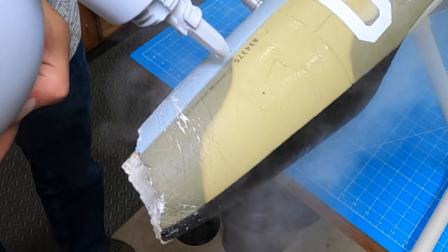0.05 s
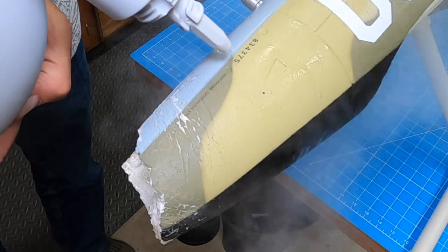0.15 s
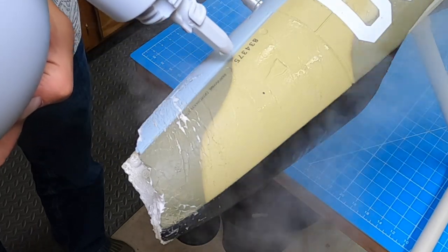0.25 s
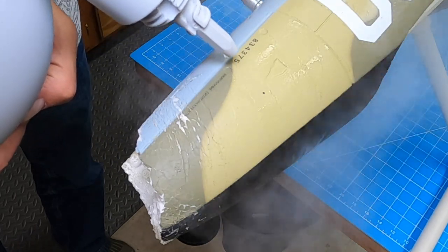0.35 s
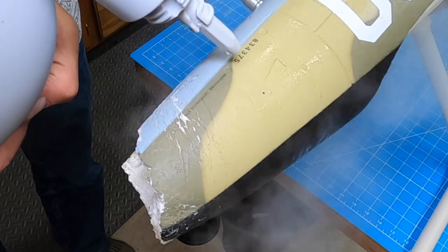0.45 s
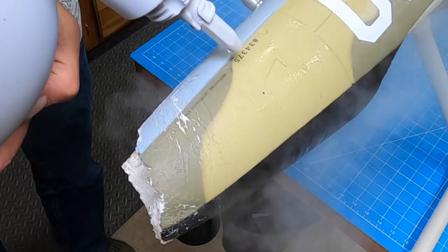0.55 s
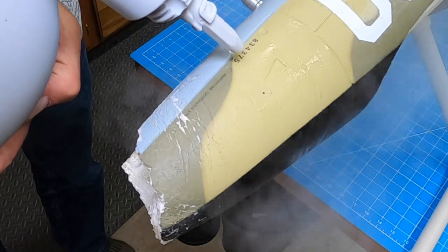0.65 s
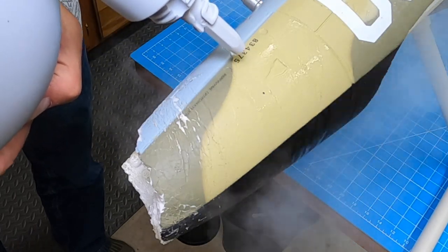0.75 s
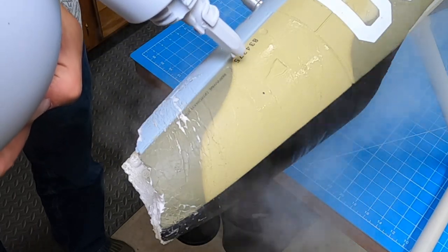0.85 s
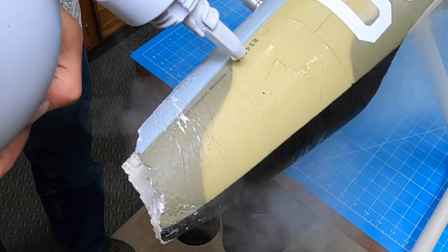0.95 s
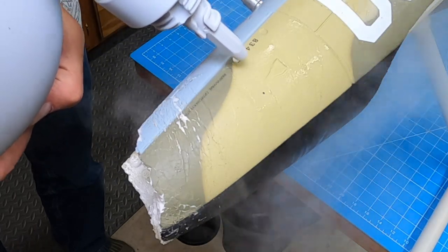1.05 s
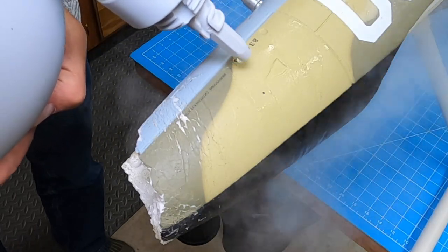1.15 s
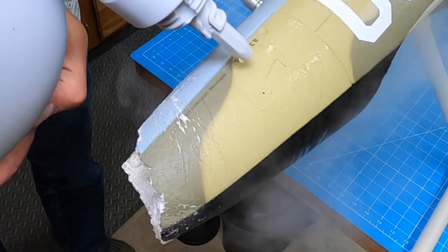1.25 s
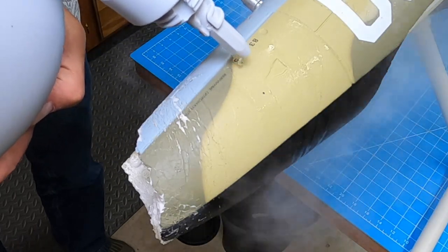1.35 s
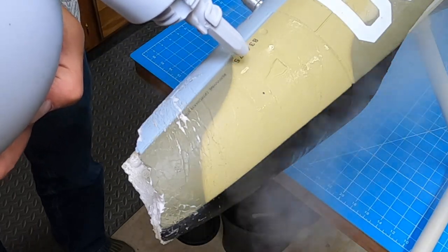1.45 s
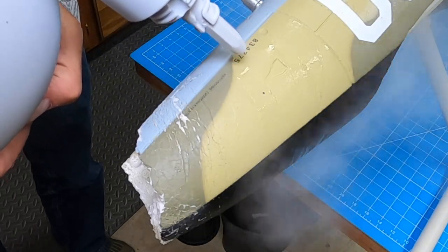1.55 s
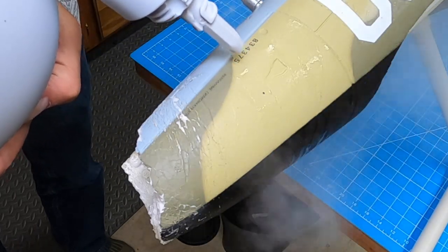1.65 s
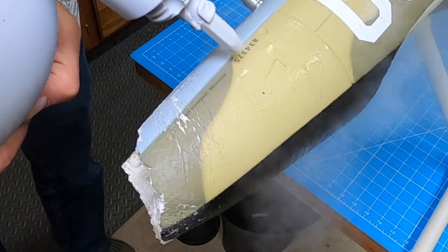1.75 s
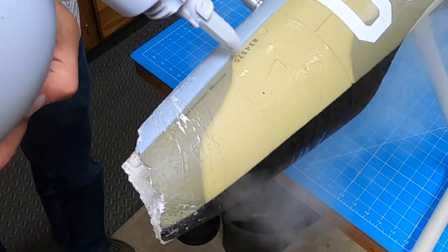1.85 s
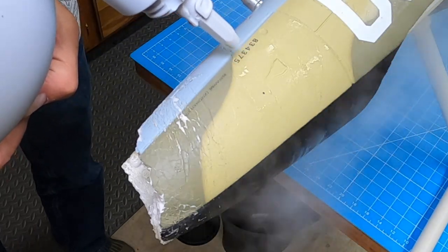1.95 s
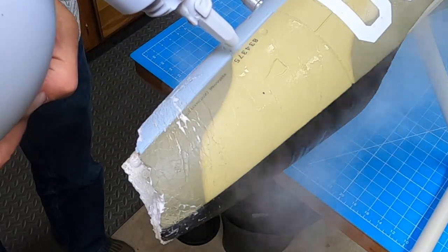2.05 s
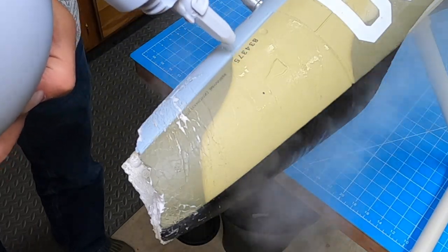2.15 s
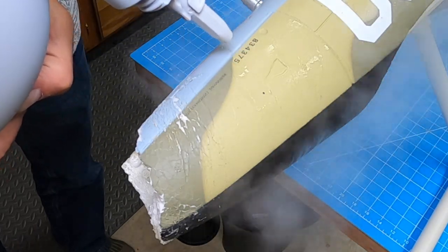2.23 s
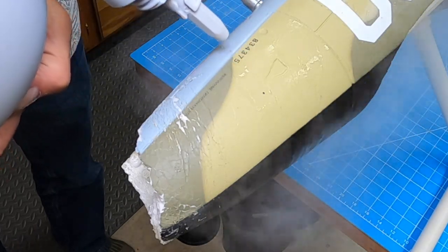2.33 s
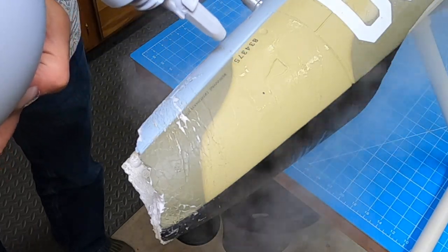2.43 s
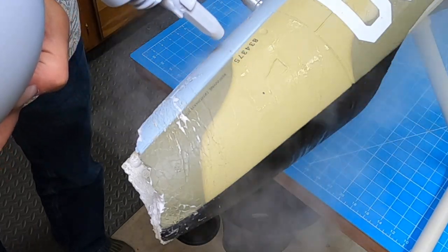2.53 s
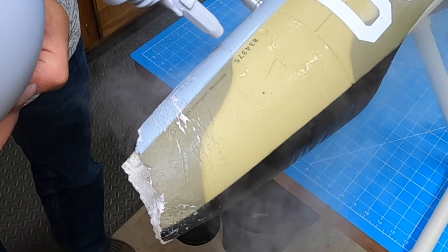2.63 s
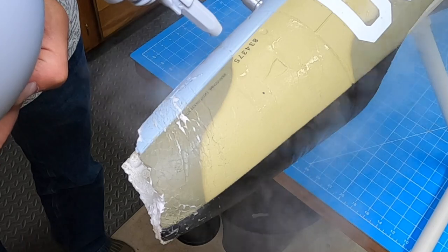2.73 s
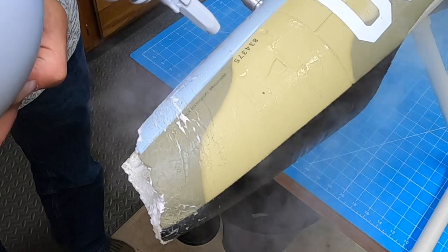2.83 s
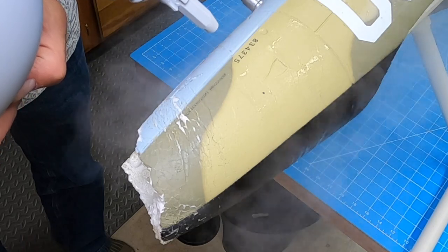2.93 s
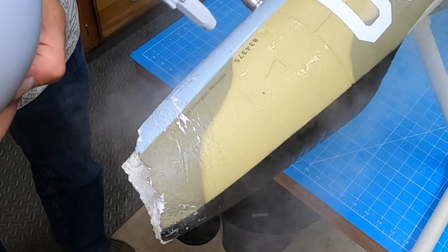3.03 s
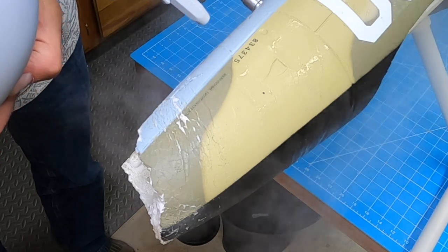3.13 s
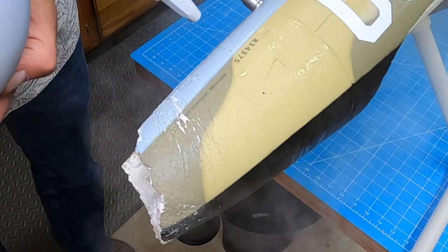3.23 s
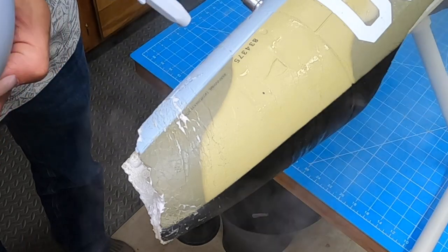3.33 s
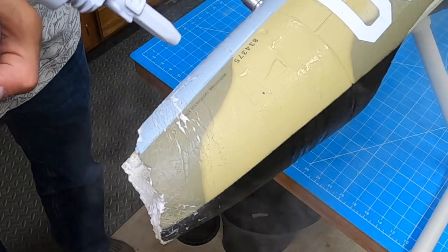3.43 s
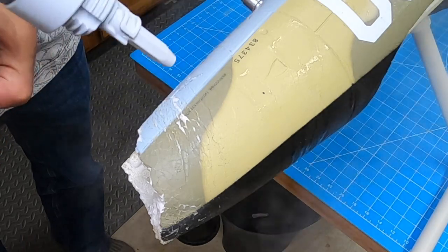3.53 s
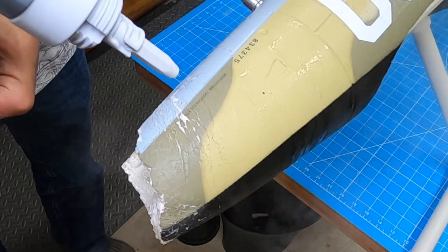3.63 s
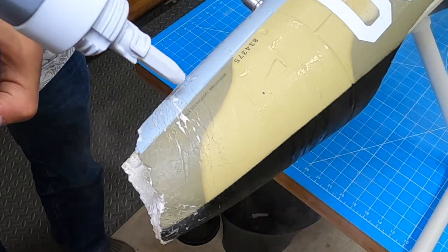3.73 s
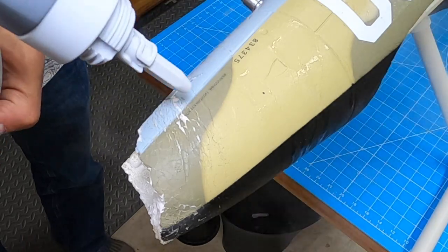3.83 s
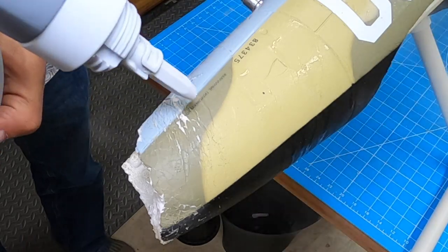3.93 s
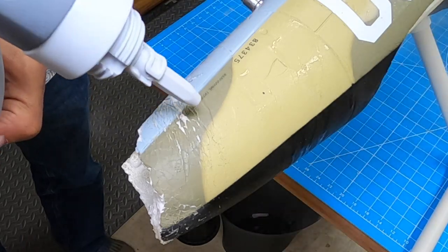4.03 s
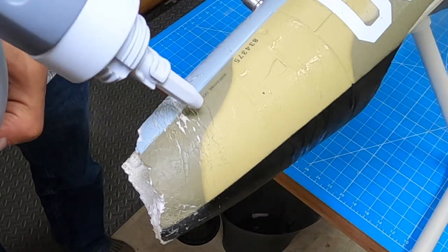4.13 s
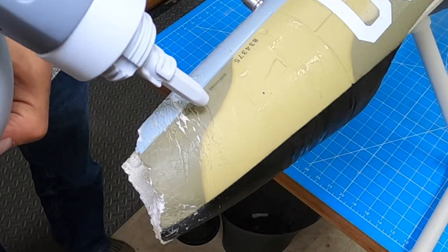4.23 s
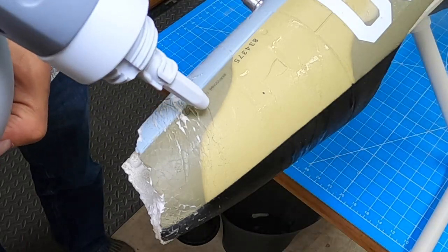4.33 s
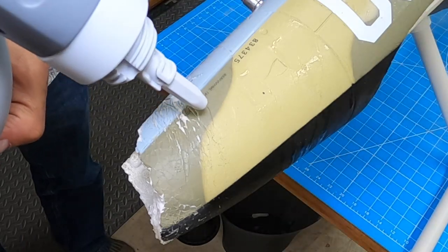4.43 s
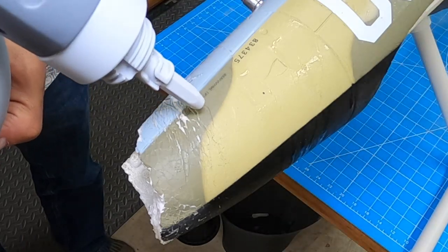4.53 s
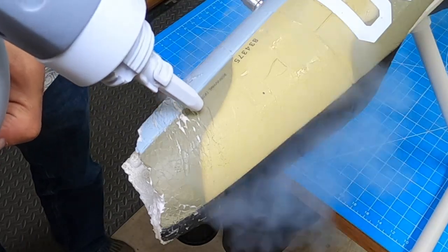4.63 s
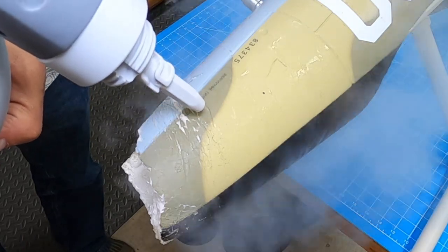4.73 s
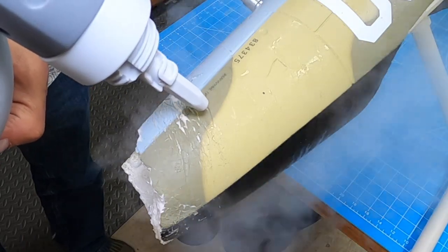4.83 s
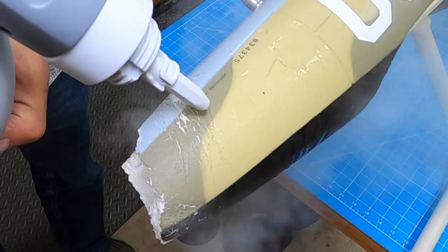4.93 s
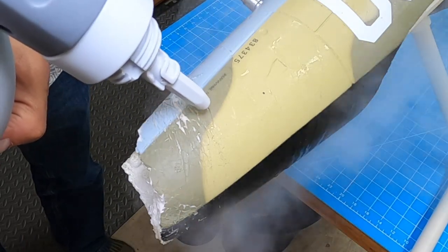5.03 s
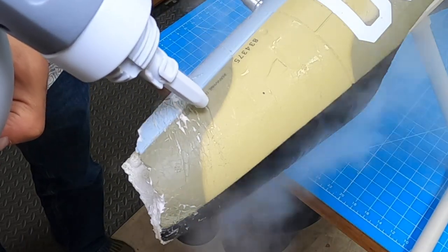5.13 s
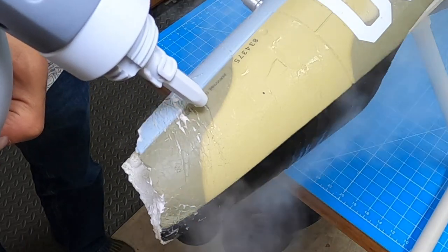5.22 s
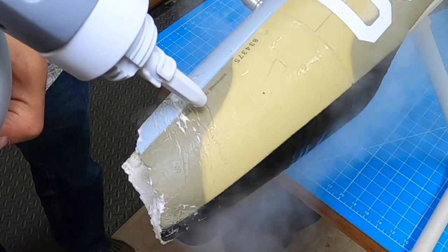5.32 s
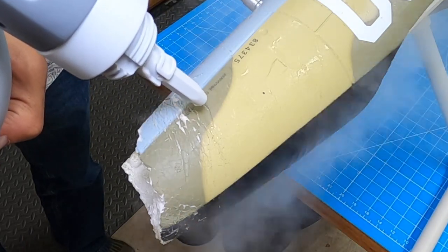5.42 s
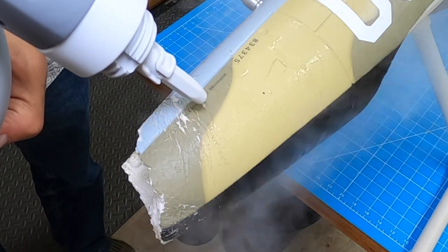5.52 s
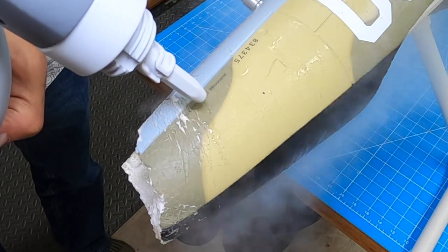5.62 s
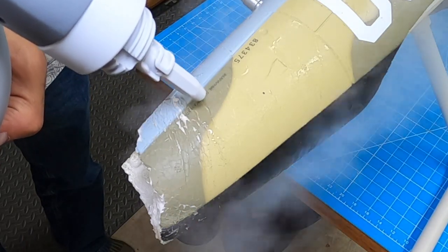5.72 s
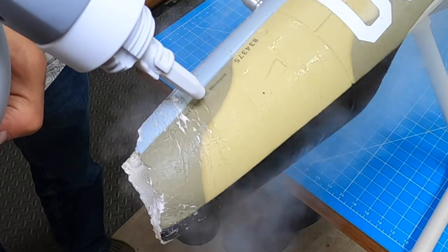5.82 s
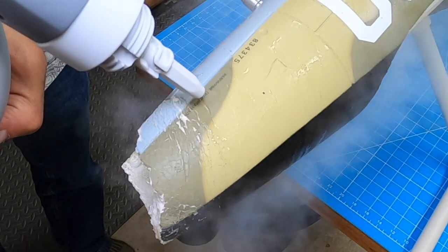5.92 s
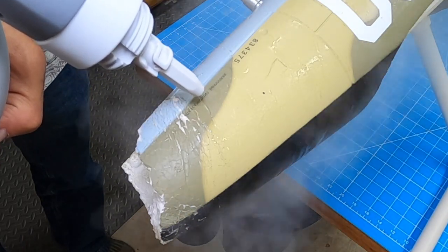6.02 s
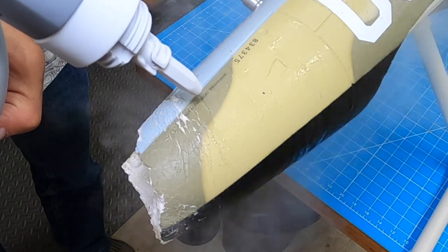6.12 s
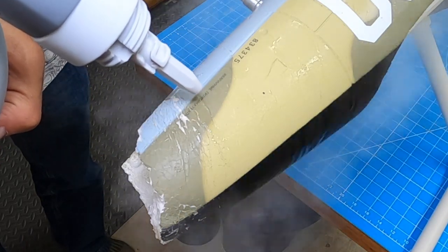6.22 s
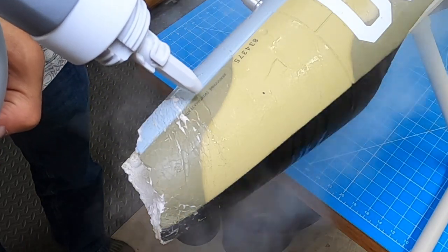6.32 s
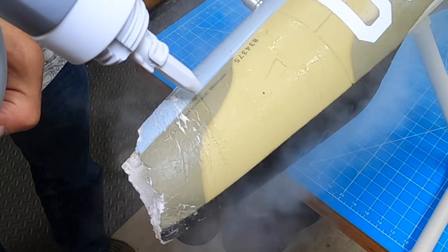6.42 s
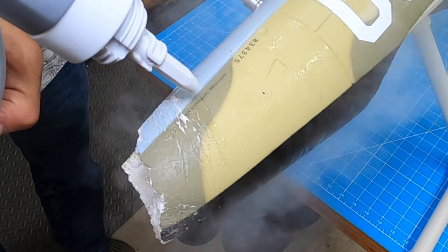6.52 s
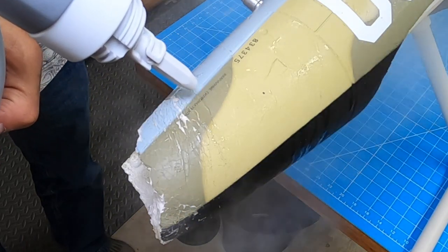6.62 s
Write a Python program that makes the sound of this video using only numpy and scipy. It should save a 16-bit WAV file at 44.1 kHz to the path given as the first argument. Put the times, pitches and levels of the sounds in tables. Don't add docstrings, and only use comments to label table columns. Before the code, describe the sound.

From 0 s a handheld steamer is already blowing, close to a small stereo microphone in a dry workshop: a loud, dense hiss strongest in the upper mids, grainy with bursting droplets, with irregular low puffs several times a second where steam breaks on foam. From about 2.3 s the puffs weaken as the nozzle lifts, and a thin, wavering whistle near 4 kHz climbs and swells, slightly left, peaking around 2.9 s. At about 3.15 s the valve snaps shut and the hiss drains away quickly. Until 4.6 s there is quiet boiler simmer, a thin leak and barely audible mains hum; a dull touch at 3.9 s and three plastic trigger clicks from 4.0 to 4.1 s, followed by stronger seething. At 4.6 s a bright spit cracks open, surging by 4.7 s into a second, slightly stronger blast that hisses and sputters steadily until the end, about 6.7 s.

```python
import sys
import numpy as np
from scipy import signal
from scipy.fft import rfft, irfft, next_fast_len
from scipy.io import wavfile
from scipy.ndimage import uniform_filter1d

SR = 44100
rng = np.random.default_rng(int(sys.argv[2]) if len(sys.argv) > 2 else 0)


def int16_out(signal):
    q = np.round(np.clip(np.atleast_2d(signal).T, -1, 1) * 32767)
    wavfile.write(sys.argv[1], SR, q.astype(np.int16))


def makeup_ratio(level_db):
    decades = np.asarray(level_db, float) / 20
    return 10 ** decades


N = 294147
T = np.arange(N) / SR
SIZE = next_fast_len(N)
HZ = np.fft.rfftfreq(SIZE, 1 / SR) + 1
PAUSE_S, RESUME_S = 3.28, 4.595
LIFT_S = 2.92


def shape(table):
    hz, value = np.transpose(table)
    return np.interp(np.log(HZ), np.log(hz), value)


def resonances(modes):
    return makeup_ratio(sum(db / (1 + (2 * (HZ - hz) / width) ** 2) for hz, width, db in modes))


def band_rms(spectrum, lo_hz, hi_hz):
    inside = (HZ > lo_hz) & (HZ < hi_hz)
    return np.sqrt(2 * np.sum(np.abs(spectrum[inside]) ** 2)) / SIZE


def walk(rate):
    hold = int(SR / rate)
    steps = np.repeat(rng.standard_normal(N // hold + 1), hold)
    return 1.3 * uniform_filter1d(uniform_filter1d(steps, hold), hold)[:N]


def peak(at_s, db, rise_db_per_s, fall_db_per_s):
    return db - np.maximum(rise_db_per_s * (at_s - T), fall_db_per_s * (T - at_s))


def opening():
    since_shut, since_open = T - 3.153, T - 4.655
    closing = -620 * since_shut
    draining = -12 - 290 * since_shut
    lingering = -47 - 32 * since_shut
    shut = np.max([closing, draining, lingering], axis=0)
    seeping = -23.5 + 120 * since_open
    start = np.maximum(1050 * since_open, seeping)
    return np.minimum(np.where(T < RESUME_S, shut, start), 0)


def bands(spectra, layer_hz, layer_db, flicker_db, rate):
    out = 0
    for octave in np.arange(5, 14.6, .5):
        window = np.clip(1 - np.abs(np.log2(HZ) - octave) * 2, 0, 1)
        share = [np.interp(octave, np.log2(layer_hz), row) for row in np.eye(len(layer_hz))]
        band_flicker_db = flicker_db * (4 if octave > 13.4 else 1)
        level_db = share @ layer_db + band_flicker_db * walk(rate)
        out = out + makeup_ratio(level_db) * irfft(spectra * window, SIZE)[:, :N]
    return out


# f/Hz, level/dB per Hz
ROOM_COLOUR = [(30, -44), (60, -24), (90, -30.5), (150, -10.5), (300, -4), (450, -3.5), (830, -18),
               (1250, -9.5), (2300, -15.5), (3200, -25), (4500, -19.5), (5600, -23), (8000, -35),
               (13000, -46.5), (15000, -56.5)]
# f/Hz, share/0-1
ROOM_ALIKE = [(60, .9), (300, 0.88), (700, 0.98), (2000, 0.5), (4500, .6), (6000, .2), (12000, .05)]
# f/Hz, width/Hz, level/dB
BOILER_RINGS = [(288, 50, 4.5), (437, 44, 5.5), (2295, 370, 4.5), (4500, 500, 4)]
# f/Hz, level/dB rms
MAINS_HUM = [
    (60, -80),
    (120, -80),
]


def workshop():
    after = 4.5 * np.exp(-np.maximum(T - PAUSE_S, 0) / 0.18)
    touch_s = 4.15
    touch = 10 * np.exp(-np.maximum(T - touch_s, 0) / 0.54) * np.clip(1 + (T - touch_s) / 0.24, 0, 1)
    simmer = 1 - 0.47 * after + 0.18 * touch
    seethe = -2.5 + .5 * after + touch
    leak = -2.5 + after + 0.89 * touch
    layers = np.array([simmer, seethe, leak, 0 * T])

    alike = np.clip(shape(ROOM_ALIKE), 0, 1)
    shared, left, right = (rfft(rng.standard_normal(N) * makeup_ratio(1.7 * walk(68)), SIZE) for _ in range(3))
    lag = np.exp(.8j * np.clip(HZ / 1000, 0, 1) * (HZ < 3800))
    common = np.sqrt(alike) * np.array([shared, shared * lag])
    pair = common + np.sqrt(1 - alike) * np.array([left, right])
    pair = pair * makeup_ratio(shape(ROOM_COLOUR)) * resonances(BOILER_RINGS) * makeup_ratio([[.6], [-.6]])
    pair = pair / band_rms(pair.mean(axis=0), 200., 600.)
    hum = sum(makeup_ratio(db + 3) * np.sin(2 * np.pi * hz * T) for hz, db in MAINS_HUM)
    return makeup_ratio(-60) * bands(pair, (350, 1600, 4500, 8000), layers, flicker_db=1.3, rate=15) + hum


# t/s, peak level/dB, brightness/dB, ring/s
TRIGGER_TICKS = [
    (3.907, -46, -20, .02),
    (4.0045, -37.5, -8, .07),
    (4.0685, -37, -4, .07),
    (4.0895, -33.5, -4, 0.088),
]
# f/Hz, width/Hz, level/dB
TRIGGER_MODES = [(900, 540, 3.5), (1470, 910, 7.5), (2900, 1500, 2.5), (4670, 1600, -3), (6400, 1600, -10)]


def trigger():
    out = np.zeros((2, N))
    t = T[:SR // 8]
    for start_s, db, bright_db, ring_s in TRIGGER_TICKS:
        decay = np.exp(-np.log(1000) * t / max(ring_s, .005))
        push = rng.standard_normal((2, len(t))) * .09 * decay
        push[:, 0] += 1
        knock = 0
        for hz, width, mode_db in TRIGGER_MODES:
            sos = signal.butter(2, [hz - width / 2, hz + width / 2], "band", fs=SR, output="sos")
            mode = signal.sosfilt(sos, signal.sosfilt(sos, push))
            knock = knock + makeup_ratio(mode_db + bright_db * (hz > 2500)) * mode
        start = int(start_s * SR)
        out[:, start:start + len(t)] += makeup_ratio(db) * knock / np.abs(knock).max()
    return out


def whistle():
    hz = 4097 + 90 * np.minimum(T - LIFT_S, 0)
    db = peak(LIFT_S, -29, rise_db_per_s=10.5, fall_db_per_s=19.5) + 2 * opening()
    phase = 2 * np.pi * np.cumsum(hz * (1 + .01 * walk(50))) / SR
    tone = np.sin(phase) * makeup_ratio(db + 2.5 + 4.0 * walk(40)) * (T < PAUSE_S)
    return tone * makeup_ratio([[1.2], [-1.2]])


def valve():
    swell = peak(4.645, -24.5, rise_db_per_s=400, fall_db_per_s=2198)
    spit = peak(4.615, -31, rise_db_per_s=1100, fall_db_per_s=1100)
    thin = np.maximum(swell, spit) + 1600 * np.minimum(T - 4.592, 0)
    burst = peak(4.715, -20, rise_db_per_s=110, fall_db_per_s=109.5) + 2 * opening()
    out = 0
    for db, edges_hz in ((thin, (3800, 6220)), (burst, (3020, 4500))):
        sos = signal.butter(3, edges_hz, "band", fs=SR, output="sos")
        hiss = signal.sosfilt(sos, rng.standard_normal(N))
        out = out + hiss / hiss.std() * makeup_ratio(db)
    return out * makeup_ratio([[1.2], [-1.2]])


def bench():
    t60_s, echo_db = .12, -14
    t = T[:SR // 4]
    echoes = rng.standard_normal(len(t)) * np.exp(-np.log(1000) * t / t60_s) * (t > .002)
    return 1 + makeup_ratio(echo_db) * rfft(echoes / np.sqrt(np.sum(echoes ** 2)), SIZE)


def turbulence():
    eddies = rng.standard_normal(N) * makeup_ratio(0.57 * walk(400))
    size_db = np.minimum(9 + 2.5 * rng.exponential(size=N), 15)
    drops = (rng.random(N) < 150 / SR) * rng.choice([-1, 1], N) * makeup_ratio(size_db)
    return rfft(eddies + drops, SIZE)


JET_LAYERS = (300, 1100, 3000, 5600, 10000)
# f/Hz, level/dB per Hz
BLAST_COLOURS = [
    [(24, -69.5), (40, -37.5), (304, -14), (327, -16.5), (389, -18.5), (510, -17), (653, -11), (995, -13),
     (2360, -3), (3100, -3), (4070, -1), (7370, -13.5), (8550, -25), (12100, -31), (14700, -48.5)],
    [(24, -70), (40, -41), (102, -20.5), (327, -14), (379, -17), (429, -11.5), (837, -11), (1410, -8),
     (2250, -0.5), (3970, -1), (5210, -3.5), (7370, -11.5), (8550, -21.5), (12100, -29.5), (14700, -51)],
]
# f/Hz, level/dB per Hz
SIDE_COLOUR = [(24, -71), (40, -40.5), (160, -18), (523, -11.5), (900, -10), (1370, -13), (2360, -2),
               (3970, 0), (5340, -8.5), (6400, -13.5), (7370, -6.5), (8130, -12.5), (10600, -6),
               (12000, -9.5), (12700, -12.5), (14700, -19.5)]
# f/Hz, share/0-1
LEFT_LEAN = [(60, .3), (600, 0.52), (1300, .8), (3000, 1), (4800, .9), (5800, .5), (7500, .92), (8500, 0.7),
             (10000, .45), (13500, .3)]
# f/Hz, width/Hz, level/dB
NOZZLE_RINGS = [
    [(2360, 290, 1.5), (4060, 220, 0), (7450, 450, 0.5), (11950, 1200, 3.5), (13400, 900, -1.5)],
    [(2750, 330, 2), (3960, 250, 2), (5320, 490, 3), (6570, 250, -4), (7550, 480, 1), (12370, 900, 2.5),
     (13530, 900, -2)],
]
# f/Hz, width/Hz, level/dB
SHELL_RINGS = [
    (338, 30, 7),
    (915, 20, 8),
    (1063, 16, 4),
]
# t/s, level/dB
BOILER_PRESSURE = [(0, -19.5), (.75, -20.5), (1.08, -20), (1.33, -21.5), (1.7, -21), (2.1, -20.5),
                   (2.7, -19.5), (3.0, -19.5), (3.15, -21.5), (4.655, -18.5), (4.72, -16.5), (4.79, -18.5),
                   (4.86, -17), (5.12, -18), (5.45, -19), (5.75, -19), (6.1, -19), (6.67, -18.8)]
# t/s, level/dB over the lull
GUSTS = [(.03, 2), (.315, 5), (.442, 7.5), (.56, 7.5), (.642, 7), (.752, 9), (.875, 6.5), (.942, 5),
         (1.09, 6), (1.187, 12), (1.341, 5.5), (1.408, 9.5), (1.447, 3.5), (1.496, 7), (1.621, 13.5),
         (1.816, 8), (1.882, 5), (1.957, 5), (2.096, 9), (2.209, 6.5), (2.319, 5.5), (2.384, 3.5),
         (2.503, 2), (2.619, 7.5), (2.785, 7), (2.87, 6.5), (3.047, 10),
         (4.69, 7.5), (4.737, 8.9), (4.775, 13.3), (4.892, 8.4), (4.951, 3.3), (5.032, 8.7),
                (5.102, 8.2), (5.197, 7.5), (5.23, 5.8), (5.351, 7.6), (5.488, 11.3), (5.604, 7.8),
                (5.698, 8), (5.793, 10.4), (5.909, 3.9), (5.983, 7.6), (6.133, 6.2), (6.231, 8.4),
                (6.354, 9.6), (6.476, 8.5), (6.581, 3.8)]


def jet():
    pressure, gate = np.interp(T, *np.transpose(BOILER_PRESSURE)), opening()
    sag = np.maximum(-20.3 - pressure, 0)

    gust_s = 0.017
    puffs = [db * np.exp(-((T - s) / gust_s) ** 2 / 2) for s, db in GUSTS]
    lifted = 5 * np.clip(T - 2.3, 0, 1) * (T < RESUME_S)
    gust = -4.5 - lifted + 0.98 * np.max(puffs, axis=0) + 1.27 * walk(25) + 1.6 * walk(45)

    sag_share, thin_max_db = 1.3, 3.5
    presence = np.minimum(-.2 * gate, thin_max_db) - sag_share / 3 * sag * (T < LIFT_S) + .4 * walk(6.8)
    sizzle = np.minimum(sag_share * sag - .2 * gate, thin_max_db) + .6 * walk(6.5)
    layers = np.array([gust, 0.29 * gust, 0 * T, presence, sizzle])

    common = turbulence() * bench() * resonances(SHELL_RINGS)
    lean = np.clip(shape(LEFT_LEAN), 0, 1)
    mids = [common * makeup_ratio(shape(colour)) * resonances(rings)
            for colour, rings in zip(BLAST_COLOURS, NOZZLE_RINGS)]
    side = makeup_ratio(shape(SIDE_COLOUR)) * (lean * common + np.sqrt(1 - lean ** 2) * turbulence())
    spectra = np.array([v / band_rms(v, 1800., 4500.) for v in mids + [side]])
    first, second, side = bands(spectra, JET_LAYERS, layers, flicker_db=0.48, rate=9)
    mid = np.where(T < RESUME_S, first, second)
    side = side * makeup_ratio(-16)
    return np.array([mid + side, mid - side]) * makeup_ratio(pressure + gate)


def scene():
    return workshop() + trigger() + whistle() + valve() + jet()


def roll_off(x):
    return signal.sosfilt(signal.butter(12, 14870, fs=SR, output="sos"), x)


def record(dry):
    x = signal.sosfilt(signal.butter(2, 60, "high", fs=SR, output="sos"), dry)
    squeezed = np.sign(x) * (.6 + .35 * np.tanh((np.abs(x) - .6) / .35))
    mix = np.where(np.abs(x) < .6, x, squeezed)
    return roll_off(mix)


dry = scene()
out = record(dry)
int16_out(out)
```